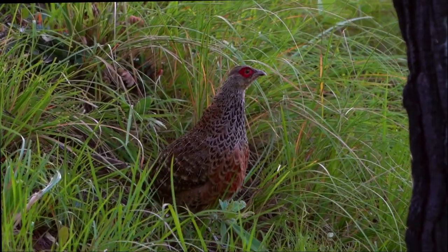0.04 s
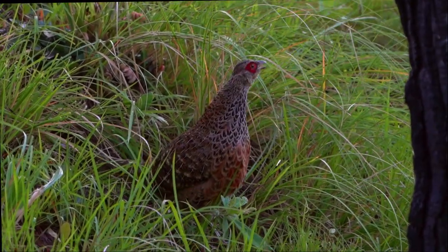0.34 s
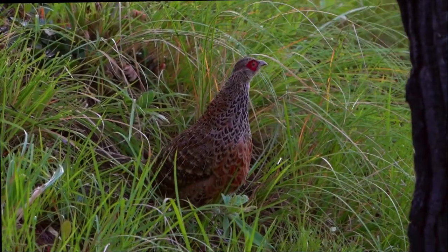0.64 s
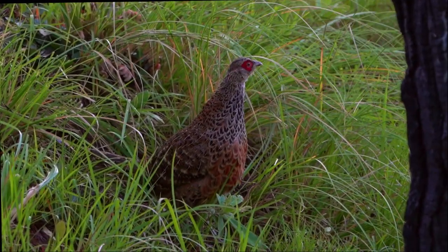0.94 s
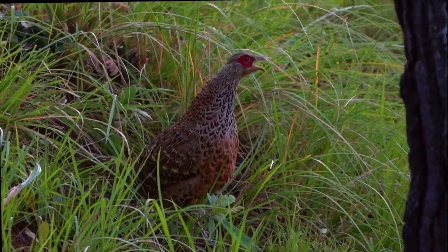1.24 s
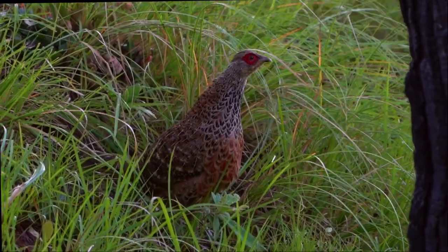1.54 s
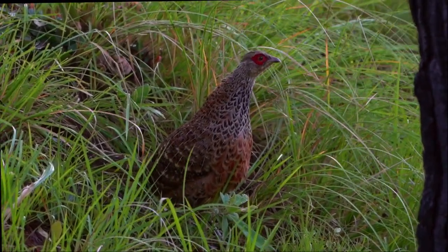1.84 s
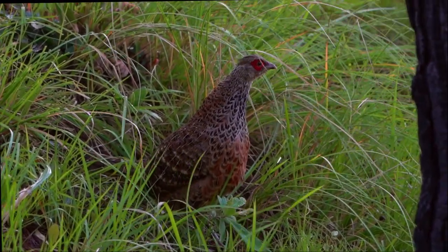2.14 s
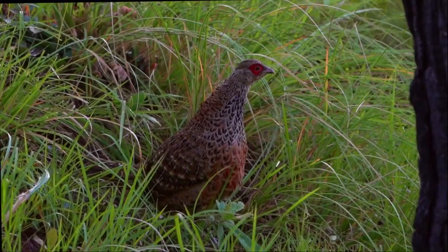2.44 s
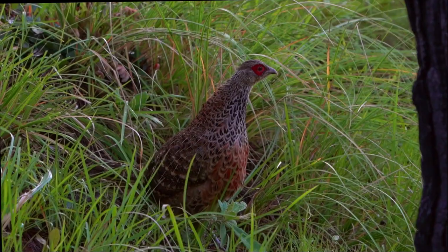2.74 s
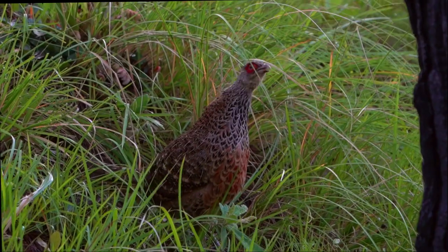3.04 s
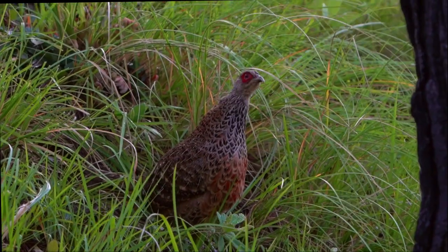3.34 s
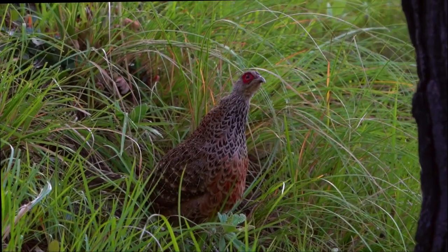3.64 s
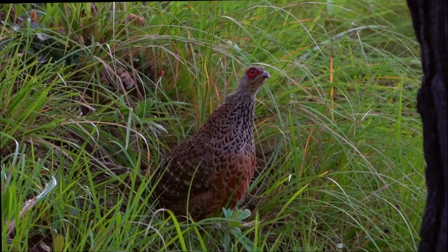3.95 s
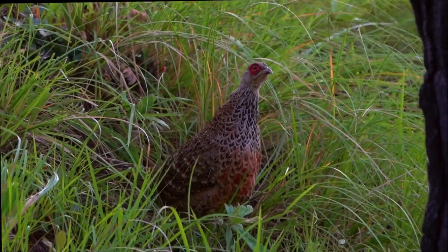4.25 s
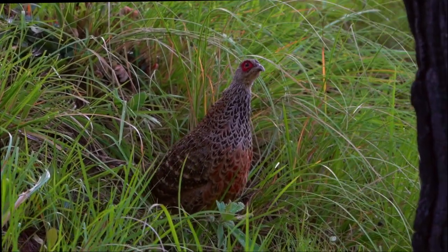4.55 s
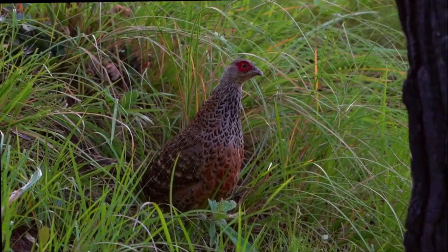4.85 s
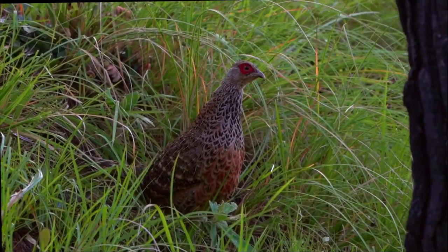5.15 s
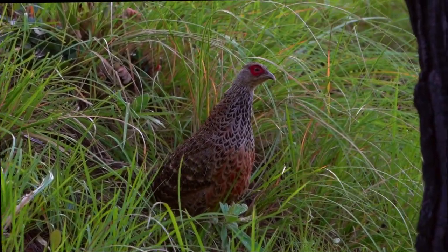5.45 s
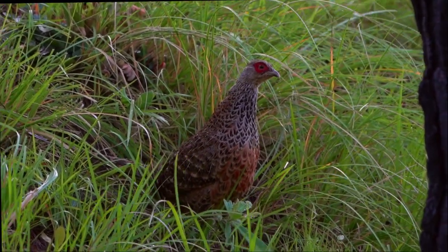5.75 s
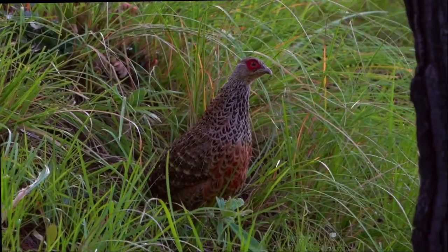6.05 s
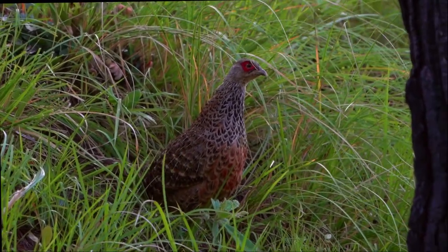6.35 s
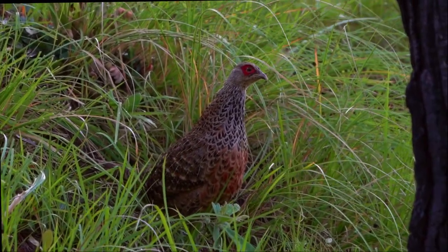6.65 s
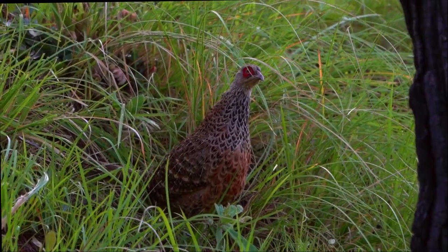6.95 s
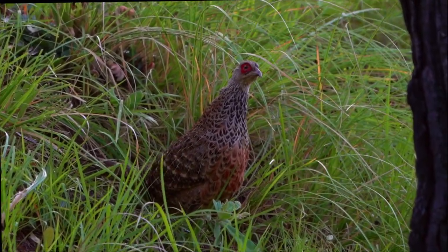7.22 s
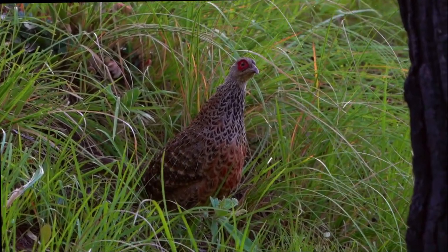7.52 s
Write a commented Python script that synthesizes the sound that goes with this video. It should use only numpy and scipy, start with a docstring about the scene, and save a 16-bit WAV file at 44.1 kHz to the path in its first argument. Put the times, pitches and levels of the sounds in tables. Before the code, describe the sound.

A wild fowl close by gives four sharp, harsh clucks at about 0.4, 1.1, 2.0 and 3.1 seconds. Each is very short and fairly high, with a raspy double beat and a brief echo from the trees; they are the loudest sounds and sit slightly to the right. Just after the second, around 1.3 seconds, the bird adds a thin whistle that arches up and drops, then a tiny purr. Throughout, a small bird on the left repeats faint falling chirps among scattered thin peeps, and a distant crow caws hoarsely, a little more than once a second. Dry grass ticks near 1 second and brushes faintly around 5.7 and 7 seconds. Underneath lie a steady, faint outdoor hiss and a soft, uneven low rumble from a handheld microphone, with dull knocks, clearest near 2.5, 2.9, 5.5 and 6.2 seconds, continuing until the end at about 7.6 seconds.

```python
"""You hear four sharp clucks from a spurfowl in tall grass, with a whistle and a short purr after the second.
The two sides of its voice box (the syrinx) sound at once and mix into hard overtones; the trees ring on.
Small birds chirp, a crow caws far off and dry stalks tick. Under it all lie a faint hiss
and the soft rumble and knocks of a hand gripping a camera."""
import sys
import numpy as np
from scipy import signal
from scipy.fft import rfft, irfft
from scipy.io import wavfile
from scipy.ndimage import map_coordinates

SR = 44100
rng = np.random.default_rng(int(sys.argv[2]) if len(sys.argv) > 2 else 0)


def generate_wav(signal):
    """Clip the signal to [-1, 1] and save it as 16-bit WAV at the path in sys.argv[1]."""
    frames = np.transpose(np.atleast_2d(signal))
    scaled = np.clip(frames, -1, 1) * 32767
    pcm = np.round(scaled).astype(np.int16)
    wavfile.write(sys.argv[1], SR, pcm)


N = 334278
TIME = np.arange(N) / SR
FREQ = np.fft.rfftfreq(N, 1 / SR) + 1e-3

# The clucks, each a main push and an afterbeat. Each row: start in seconds, base level in dB,
# low and high voice in Hz, overtones in relative dB, then the afterbeat's delay in seconds,
# half-length in seconds and relative level in dB.
CLUCKS = [(0.367, -19.5, 1558, 2176, -6.5, 0.049, 0.0088, -2.5),
          (1.108, -19.5, 1587, 2180, -7, .046, 0.013, -3), (2.035, -19, 1598, 2204, -7, .050, 0.0062, -2.5),
          (3.096, -19.5, 1545, 2148, -6.5, .044, 0.0084, -3)]
# Tones made as the voices mix. Each row: multiple of the low voice, of the high voice, relative dB.
OVERTONES = [(-1, 2, -2.5), (2, 0, 0), (1, 1, 0), (0, 2, 1.5), (3, 0, -3), (-1, 3, -7.5), (2, 1, -0.5),
             (-2, 4, -5.5), (1, 2, -10.5), (0, 3, -11.5), (3, 1, -28), (-1, 4, -7.5), (1, 3, -16.5),
             (0, 4, -19), (-1, 5, -18.5), (0, 5, -29)]
# How throat and beak colour the rasp. Each row: frequency in Hz, gain in dB.
THROAT_COLOUR = [(600, -13), (1000, -4.5), (2400, 0), (3100, 0.5), (4000, 3), (5400, -18), (6200, -15),
                 (7200, -4), (9300, -4.5), (11000, -15.5), (15500, -24)]
# The path of the whistle. Each row: time in seconds, pitch in Hz, level in dB.
WHISTLE_PATH = [(1.236, 2054, -30), (1.249, 2965, -30.5), (1.255, 3590, -40.5), (1.28, 4080, -37.5),
                (1.307, 4870, -49), (1.33, 4570, -36.5), (1.341, 3760, -26.5), (1.349, 3200, -17.5),
                (1.36, 2040, -39.5)]
# The effort behind the purr. Each row: time in seconds, relative level in dB.
PURR_EFFORT = [(1.362, -36), (1.386, -36), (1.406, -23.5), (1.43, -20.5), (1.44, -36)]
# Sound bouncing off the ground favours one side. Each row: frequency in Hz, left minus right in dB.
GROUND_BALANCE = [(1000, -2), (1560, -3), (1800, -7), (2170, -12), (2800, -3.5), (5000, 0.5), (7500, -9),
                  (12000, 0)]
# Echoes from trunks and a bank. Each row: delay in seconds, left gain in dB, right gain in dB.
ECHOES = [(.0145, -41, -14.5), (0.042, -34, -19), (.065, -29, -36.5), (0.046, -39, -25)]
# One falling chirp. Each row: seconds from its start, pitch in Hz, relative level in dB.
CHIRP_SHAPE = [(0, 4850, -8), (.022, 4560, -3), (.05, 4150, 1), (.094, 3400, -1.5), (.112, 3280, -9)]
# A small bird's chirps. Each row: start in seconds, relative level in dB, pitch multiplier.
CHIRPS = [(0.166, -53, 1), (2.798, -55.5, 1), (3.61, -54, 1.005), (4.485, -57.5, 1), (5.396, -58, 1.02),
          (6.253, -57, .98), (7.298, -56, 0.98)]
# Other small birds. Each row: start and length in seconds, first and last pitch in Hz, relative dB.
PEEPS = [(0.847, 0.025, 6150, 5920, -61), (0.854, 0.021, 4900, 5470, -50.5), (0.873, 0.02, 6000, 5970, -63),
         (0.952, 0.018, 5850, 5500, -58), (0.986, 0.023, 5900, 6100, -63), (1.645, 0.024, 5320, 5130, -58),
         (4.752, 0.19, 3950, 3420, -63), (6.447, 0.077, 5770, 5500, -67), (6.657, 0.09, 4730, 4480, -63),
         (6.672, 0.15, 3770, 3500, -61), (6.777, .04, 5400, 5200, -65)]
# The crow's caws. Each row: start and rough length in seconds, relative dB, base throat ring in Hz.
CAWS = [(.01, 0.1, -48.5, 1050), (0.6, 0.26, -54.5, 1070), (1.8, 0.32, -59.5, 1400),
        (2.379, 0.23, -54.5, 1430), (2.953, 0.18, -52.5, 1410), (3.495, 0.26, -54, 1370),
        (4.273, 0.25, -56, 1330), (4.876, 0.29, -56, 1380), (5.658, 0.18, -58, 1390),
        (6.326, 0.2, -55.5, 1360), (7.045, 0.22, -60, 1350), (7.52, 0.18, -57.5, 1370)]
# Grass ticks and swishes. Each row: middle and half-length in seconds, centre and width in Hz, dB.
GRASS_TOUCHES = [(1.043, 0.0013, 6500, 3400, -35), (1.4, .0015, 8700, 2500, -51),
                 (5.725, .04, 9000, 11000, -59), (5.722, 0.026, 985, 210, -48),
                 (6.17, .003, 1800, 1500, -54), (6.972, 0.5, 8300, 9200, -67)]
# How strongly the grip rumbles. Each row: time in seconds, relative level in dB.
GRIP_LEVEL = [(0.0, -53), (0.21, -44), (0.53, -47.5), (0.65, -38), (1.29, -42), (1.69, -51), (1.79, -43.5),
              (2.03, -48.5), (2.15, -39), (2.38, -46.5), (2.49, -37), (2.55, -45.5), (3.17, -39.5),
              (3.91, -60), (4.09, -41.5), (4.37, -39), (4.43, -50.5), (5.28, -48), (5.32, -43), (6.36, -46),
              (6.71, -40), (6.73, -49), (7.03, -38.5), (7.28, -44.5), (7.43, -37), (7.58, -50.5)]
# The colour of that rumble. Each row: frequency in Hz, gain in dB.
RUMBLE_COLOUR = [(15, -72), (25, -39), (32, -44.5), (35, -36), (45, -20.5), (69, -6), (128, 2.5),
                 (244, -3.5), (600, -21), (798, -27.5), (900, -34), (1170, -29.5), (1980, -120)]
# The camera body shakes the left side later. Each row: frequency in Hz, left's lead in radians.
BODY_PHASE = [(30, -.15), (100, -0.5), (250, -1.18), (550, -1.57)]
# Knocks of the grip. Each row: start in seconds, relative level in dB, pitch in Hz.
KNOCKS = [(2.488, -27, 187), (2.894, -24.5, 191), (3.978, -39, 224), (4.092, -33, 231), (4.323, -33.5, 277),
          (5.479, -27, 200), (5.978, -34, 177), (6.197, -29, 183), (6.703, -34, 278), (6.86, -38, 258),
          (7.385, -33, 253)]
# The colour of still air and microphone hiss. Each row: frequency in Hz, gain in dB.
HISS_COLOUR = [(30, 2), (100, 5.5), (500, 3.5), (1000, 0), (1600, -2.5), (2500, -5), (4500, -3.5),
               (7000, -10.5), (11000, -10), (16000, -15)]


def spurfowl(wet_db=-13, right_lead_s=0.00002):
    """The near bird calls; its voice bounces off the ground and trunks and rings in the trees."""
    voice = np.zeros(N)
    for start, sound in [(start, cluck(*row)) for start, *row in CLUCKS] + [whistle(), purr()]:
        add(voice, start, sound)
    ratio = undb(on_freq(GROUND_BALANCE))
    sides = np.array([ratio * delayed(right_lead_s), np.ones(len(FREQ))]) * 2 / (1 + ratio)
    out = colour(voice, sides)
    for delay, *ear_db in ECHOES:
        for ear, db in zip(out, ear_db):
            add(ear, delay, undb(db) * voice)
    scatter_db = on_freq([(1000, 4.5), (1550, -4.5), (2200, 5), (3000, -0.5), (4500, 5.5),
                          (8000, 12), (14000, 15)])
    scattered = colour(voice, undb(scatter_db))
    return out + undb(wet_db) * trees(scattered, t60=0.84, treble_t60=0.4, build_s=0.0094)


def cluck(db, low_hz, high_hz, overtone_db, after_s, after_half_s, after_db, throb_hz=164.5):
    """Two voices press through one narrow gap and mix; at the end the membranes go slack and rattle."""
    t = TIME[:SR // 10]
    since_sag = t - after_s + 0.0047  # the sag begins just before the afterbeat peaks
    slack = np.clip(since_sag / 0.015, 0, 1)
    low, high = voice_phases(t, low_hz, high_hz, since_sag, slack)
    low_gain, high_gain = voice_gains(t, after_s, after_half_s, after_db)
    throb = 1 + 0.36 * slack * np.cos(turn(throb_hz * (1 + 0.173 * wander(t, 153))))
    flutter = 0.26 + 0.73 * slack
    voices = sum(gain * np.sqrt(2) * np.sin(phase) * (1 + flutter * wander(t, 502))
                 for phase, gain in ((low, low_gain), (high, high_gain)))
    rasp = undb(-11 + 7 * slack) * breath(high - low)
    harshness = undb(overtone_db) * held(t, attack_s=0.0051, hold_s=0.024, release_s=0.014)
    rattle = undb(-20) * swell(t, peak_s=0.059, half_s=0.015) * noise_band(t, hz=1130, width_hz=600)
    return undb(db) * throb * (voices + harshness * (overtones(t, low, high) + rasp) + rattle)


def voice_phases(t, low_hz, high_hz, since_sag, slack, jump_hz=144.4, sag_hz_per_s=15000, quaver_hz=32.6):
    """Both voices scoop up into the note and quaver, then jump and sag as they go slack."""
    scoop = 1 - 0.061 * np.exp(-t / 0.0044) + 0.015 * np.sin(2 * np.pi * quaver_hz * t)
    jump = jump_hz * np.clip(1 + since_sag / 0.005, 0, 1)
    bend_hz = np.maximum(jump - sag_hz_per_s * np.maximum(since_sag, 0), -130)
    jitter = 0.015 + 0.052 * slack
    return [turn(hz * scoop * (1 + jitter * wander(t, 603.4)))
            for hz in (low_hz + bend_hz, high_hz + bend_hz / 2)]


def voice_gains(t, after_s, after_half_s, after_db, high_lead_s=0.0073):
    """In both push and afterbeat the high voice swells first, then the low; one last flap follows."""
    push = undb(-6) * held(t, attack_s=0.0048, hold_s=0.035, release_s=0.006)
    high_swell = undb(-1.5) * swell(t, peak_s=0.019, half_s=0.012)
    low_swell = undb(-4.5) * swell(t, peak_s=0.025, half_s=0.0059)
    high_after = undb(after_db - 4.5) * swell(t, after_s - high_lead_s, after_half_s)
    low_after = undb(after_db) * swell(t, after_s, after_half_s)
    flap = undb(-11.5) * swell(t, peak_s=0.0686, half_s=0.0054)
    return push + low_swell + low_after + flap, high_swell + high_after


def overtones(t, low, high, flicker_db=4, smear_rad=0.55):
    """The voices mix into sum and difference tones, each flickering and slipping in phase."""
    tones = np.zeros(len(t))
    for low_multiple, high_multiple, db in OVERTONES:
        gain = undb(db + flicker_db * wander(t, 158))
        phase = low_multiple * low + high_multiple * high + rng.uniform(0, 2 * np.pi)
        tones += gain * np.sin(phase + smear_rad * wander(t, 219))
    return unit(tones)


def breath(beat_phase):
    """A puff of air escapes through throat and beak once in each beat of the two voices."""
    count = len(beat_phase)
    puffs = rng.standard_normal(count) * (1 + np.cos(beat_phase))
    throat_db = np.interp(np.fft.rfftfreq(count, 1 / SR), FREQ, on_freq(THROAT_COLOUR))
    return unit(irfft(rfft(puffs) * undb(throat_db), count))


def whistle():
    """One voice flips up into a thin, slightly husky arching tone and drops back."""
    t, gate, hz, db = gesture(WHISTLE_PATH, rise_s=0.0047, fall_s=0.0024)
    tone = harmonics(turn(hz * (1 + 0.015 * wander(t, 1100))), second_db=-20, third_db=-32)
    rasp = undb(-27) * noise_band(t, hz=6000, width_hz=8000)
    return t[0], gate * undb(db + 1.9 * wander(t, 253)) * (np.sqrt(2) * tone + rasp)


def purr(full_effort_db=-19.5, sag_start_s=1.421):
    """The low voice throbs as the membranes beat together; pitch and throb rise with effort, then sag."""
    t, gate, db = gesture(PURR_EFFORT, rise_s=0.003, fall_s=0.002)
    effort_db = np.maximum.accumulate(db) - full_effort_db
    sag = np.exp(-10 * np.maximum(t - sag_start_s, 0))
    pitch_hz = (1864 + 22 * effort_db) * sag * (1 + 0.021 * wander(t, 394))
    throb_hz = (289.3 + 6.5 * effort_db) * sag ** 2 * (1 + 0.1 * wander(t, 205))
    throb = 1.5 + 0.84 * np.cos(turn(throb_hz))
    tone = harmonics(turn(pitch_hz), second_db=-23, third_db=-23)
    return t[0], gate * undb(db + 1.5) * unit(throb * tone)


def small_birds():
    """Almost pure falling chirps and thin peeps come from the trees on the left."""
    chirps, peeps = np.zeros((2, N))
    for start, level_db, pitch in CHIRPS:
        t, gate, hz, db = gesture(CHIRP_SHAPE, rise_s=0.00511, fall_s=0.0061)
        phase = turn(pitch * hz * (1 + 0.014 * wander(t, 405)))
        add(chirps, start, gate * undb(level_db + db) * np.sqrt(2) * np.sin(phase))
    for start, length, from_hz, to_hz, db in PEEPS:
        t, gate, hz = gesture([(0, from_hz), (length, to_hz)], rise_s=0.0037, fall_s=0.0047)
        phase = turn(hz * (1 + 0.0277 * wander(t, 499)))
        add(peeps, start, gate * undb(db) * np.sqrt(2) * np.sin(phase))
    return (from_afar(chirps, left_lead_s=0.000084, direct_db=5, wet_db=4.5, spread=0.22, t60=0.59)
            + from_afar(peeps, left_lead_s=0.00011, direct_db=6, wet_db=0.5, spread=0.29, t60=0.47))


def crow(pitch_hz=265, rasp=2, throat_lift=1.117):
    """Hoarse, echoing caws from far away: pulses and breath ring in the throat, breath in the chest."""
    calls = np.zeros(N)
    for start, length, db, throat_hz in CAWS:
        t, gate = gesture([(0,), (length * 0.68,)], rise_s=0.0092, fall_s=0.13)
        phase = turn(pitch_hz * (1 + 0.0486 * wander(t, 123.6)))
        pulses = unit(np.diff(signal.sawtooth(phase), prepend=0))
        throat = band(pulses + rasp * rng.standard_normal(len(t)), throat_hz * throat_lift, width_hz=600)
        chest = undb(-5) * noise_band(t, hz=1050, width_hz=600)
        add(calls, start, gate * undb(db) * unit(unit(throat) + chest))
    calls = colour(calls, undb(on_freq([(500, -15), (850, 3), (1750, -4), (2400, 0.5)])))
    return from_afar(calls, left_lead_s=-0.000028, direct_db=-1.5, wet_db=-1.5, spread=0.74, t60=0.67)


def grass():
    """Dry stalks tick and brush, each a swell of noise."""
    out, t = np.zeros(N), TIME[:SR] - 0.5
    for middle, half_s, hz, width_hz, db in GRASS_TOUCHES:
        envelope = undb(db) * np.exp(-2 * (t / half_s) ** 2)
        add(out, middle + t[0], envelope * noise_band(t, hz, width_hz))
    return out


def handling(slips_per_s=220, split_hz=330, left_db=0.95):
    """The grip creeps in tiny slips that thud through the camera body to both sides of the microphone."""
    rumble_db = np.interp(TIME, *np.transpose(GRIP_LEVEL)) + 1.72 * wander(TIME, 13)
    upper_db = -12 - 0.08 * (rumble_db - rumble_db.mean())  # the upper rumble swings less
    slips = (rng.random(N) < slips_per_s / SR) * rng.choice([-1, 1], N)
    slips = slips * undb(5 * np.clip(rng.standard_normal(N), -2, 2))
    shake = colour(unit(slips) + 0.76 * rng.standard_normal(N), undb(on_freq(RUMBLE_COLOUR)))
    upper_share = 1 / (1 + (split_hz / FREQ) ** 6)
    low, upper = unit(colour(shake, 1 - upper_share)), unit(colour(shake, upper_share))
    rumble = undb(rumble_db - 1) * (low + undb(upper_db) * upper)
    half_lead = on_freq(BODY_PHASE) / 2
    sides = np.array([undb(left_db) * np.exp(1j * half_lead), np.exp(-1j * half_lead)])
    return colour(rumble + knocks(), sides / np.cos(half_lead))


def knocks(gain_db=3, decay_cycles=0.65):
    """The grip gives the camera dull knocks that die within a cycle or two."""
    out, t = np.zeros(N), TIME[:SR // 20]
    for start, db, hz in KNOCKS:
        add(out, start, undb(db + gain_db) * np.sin(2 * np.pi * hz * t) * np.exp(-t * hz / decay_cycles))
    return colour(out, undb(on_freq([(40, -23), (150, 0), (600, 6), (1200, -15), (3000, -50)])))


def air(level_db=-54.5, left_share=0.26, left_lead_s=0.00014):
    """Outdoor hiss: mostly different at each ear, partly from the trees on the left."""
    noise = rng.standard_normal((3, N))
    from_left = np.array([noise[2], colour(noise[2], delayed(left_lead_s))])
    hiss = np.sqrt(1 - left_share) * noise[:2] + np.sqrt(left_share) * from_left
    return undb(level_db) * unit(colour(hiss, undb(on_freq(HISS_COLOUR))))


def from_afar(x, left_lead_s, direct_db, wet_db, spread, t60):
    """A far sound and most of its echo come from one direction, reaching one ear a little earlier."""
    scatter, sideways = undb(wet_db) * trees(x, t60, treble_t60=0.9 * t60, build_s=0.006)
    ahead = undb(direct_db) * x + scatter
    return np.array([ahead + spread * sideways, colour(ahead, delayed(left_lead_s)) - spread * sideways])


def trees(x, t60, treble_t60, build_s):
    """Echo from trunks and leaves builds up, then fades by 60 dB in t60 seconds, the treble sooner."""
    t = TIME[:SR]
    noise = rng.standard_normal((2, SR))
    low = signal.sosfilt(signal.butter(2, 3500, fs=SR, output="sos"), noise)
    high = signal.sosfilt(signal.butter(2, 3500, "high", fs=SR, output="sos"), noise)
    tail = low * undb(-60 * t / t60) - high * undb(-60 * t / treble_t60)
    tail *= 1 - np.exp(-t / build_s)
    return signal.fftconvolve(x[None], unit(tail) / np.sqrt(SR), axes=1)[:, :N]


def gesture(rows, rise_s, fall_s):
    """The times of one call, a gate that fades it in and out, and a curve for each further column."""
    times, *columns = np.transpose(rows)
    t = np.arange(times[0] - rise_s, times[-1] + fall_s, 1 / SR)
    gate = np.clip((t - t[0]) / rise_s, 0, 1) * np.clip((t[-1] - t) / fall_s, 0, 1)
    return t, gate, *(np.interp(t, times, column) for column in columns)


def swell(t, peak_s, half_s):
    """A bell-shaped rise and fall."""
    return np.exp(-((t - peak_s) / half_s) ** 2)


def held(t, attack_s, hold_s, release_s):
    """Rise, stay level, then die away."""
    return np.clip(t / attack_s, 0, 1) * np.exp(-np.maximum(t - hold_s, 0) / release_s)


def wander(t, rate):
    """A smooth random curve with a spread near 1, changing rate times a second."""
    place = (t - t[0]) * rate
    return map_coordinates(rng.standard_normal(int(place[-1]) + 2), [place], order=3, mode="nearest")


def turn(hz):
    """The phase (angle so far) of a wave that follows a pitch curve."""
    return 2 * np.pi * np.cumsum(hz) / SR


def harmonics(phase, second_db, third_db):
    """A tone plus weaker ones at two and three times its pitch."""
    return np.sin(phase) + undb(second_db) * np.sin(2 * phase) + undb(third_db) * np.sin(3 * phase)


def band(x, hz, width_hz):
    """Keep the sound near one frequency, filtering twice for steep edges."""
    b, a = signal.iirpeak(min(hz, SR * 0.45), hz / width_hz, SR)
    return signal.lfilter(b, a, signal.lfilter(b, a, x))


def noise_band(t, hz, width_hz):
    """Noise around one frequency."""
    return unit(band(rng.standard_normal(len(t)), hz, width_hz))


def colour(x, gain):
    """Give each frequency its own gain."""
    return irfft(rfft(x) * gain, N)


def delayed(seconds):
    """The gains that make colour() delay a sound."""
    return np.exp(-2j * np.pi * FREQ * seconds)


def on_freq(points):
    """Join (Hz, value) points into a curve, with every octave equally wide."""
    hz, value = np.transpose(points)
    return np.interp(np.log(FREQ), np.log(hz), value)


def undb(db):
    """Turn decibels into a gain."""
    return 10 ** (np.asarray(db) / 20)


def unit(x):
    """Scale to an average (rms) level of 1."""
    return x / np.sqrt(np.mean(x ** 2))


def add(track, start, sound):
    """Mix a sound into a track at a start time in seconds."""
    i = int(np.clip(start * SR, 0, N))
    track[i:i + len(sound)] += sound[:N - i]


def scene():
    """All the sounds together, in stereo."""
    return spurfowl() + small_birds() + crow() + grass() + handling() + air()


def record(dry, top_hz=15800):
    """Cut away the very highest treble."""
    return signal.sosfilt(signal.ellip(10, 0.1, 70, top_hz, fs=SR, output="sos"), dry)


dry = scene()
out = record(dry)
generate_wav(out)
```